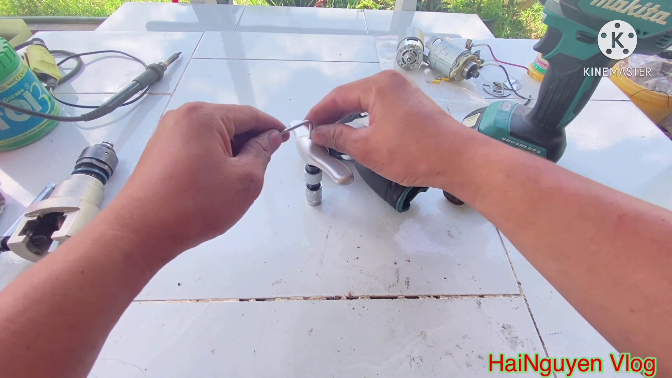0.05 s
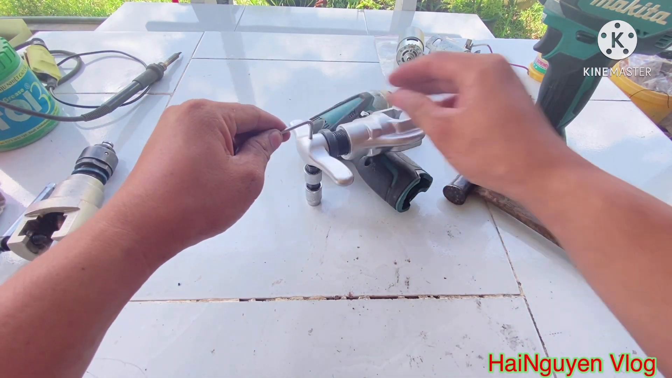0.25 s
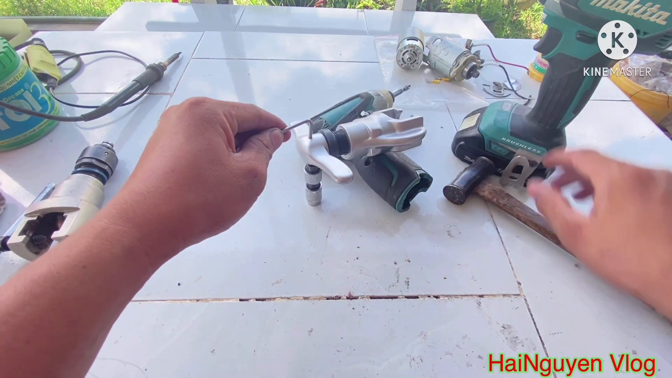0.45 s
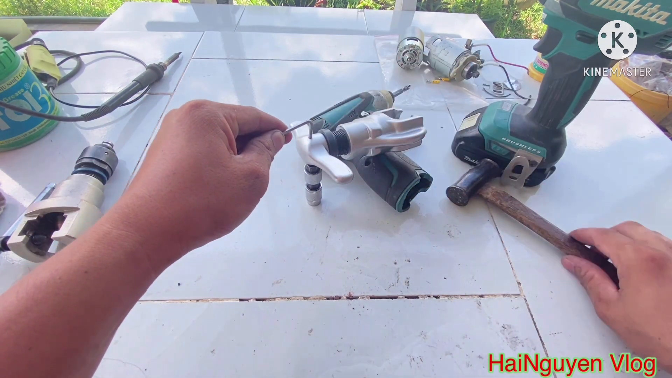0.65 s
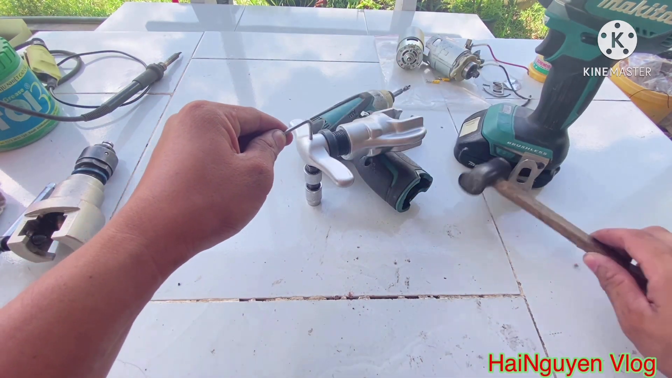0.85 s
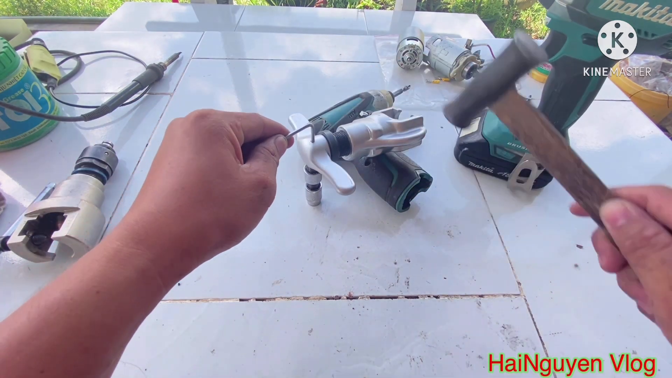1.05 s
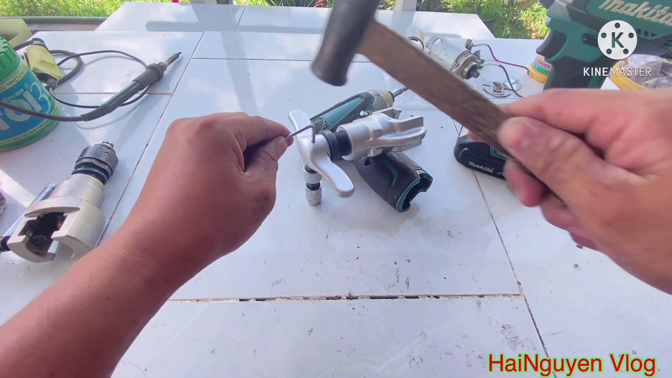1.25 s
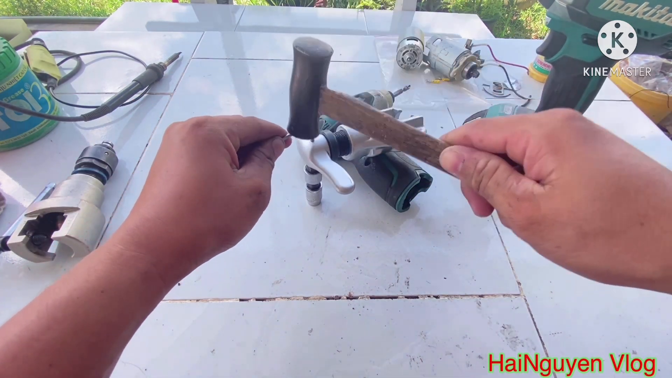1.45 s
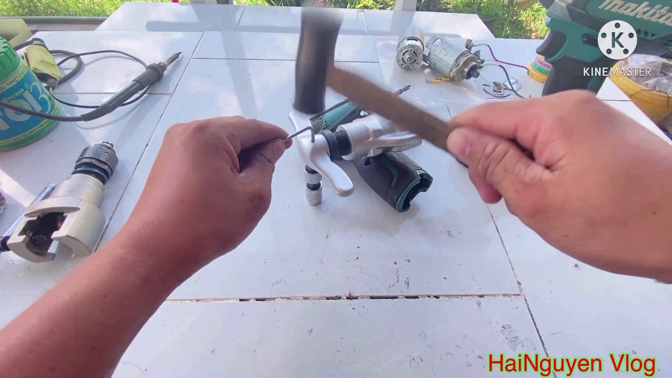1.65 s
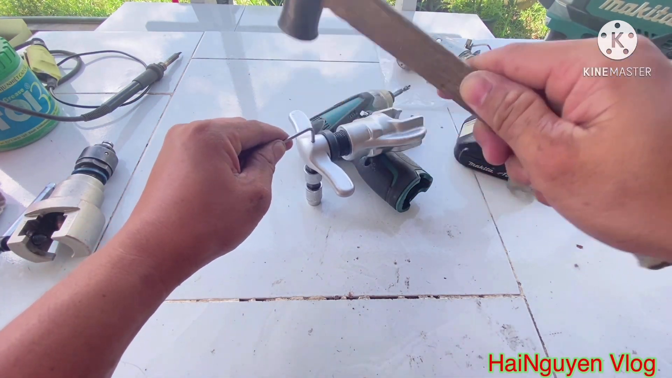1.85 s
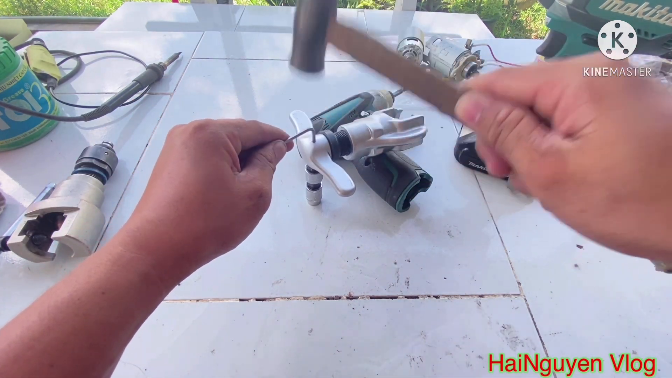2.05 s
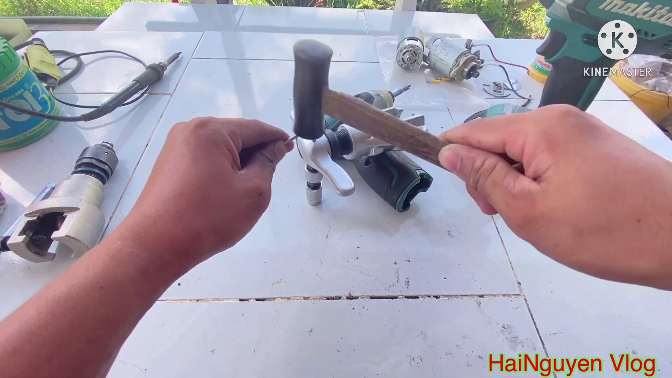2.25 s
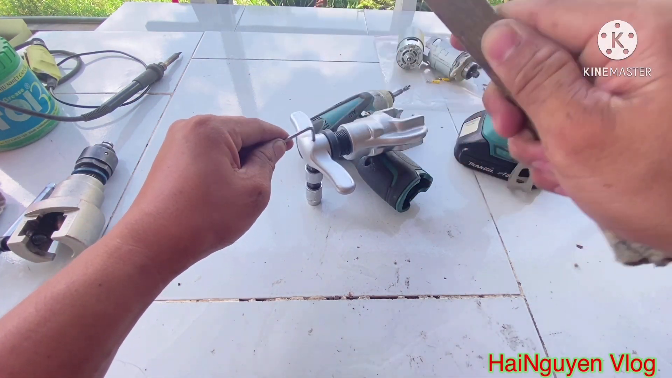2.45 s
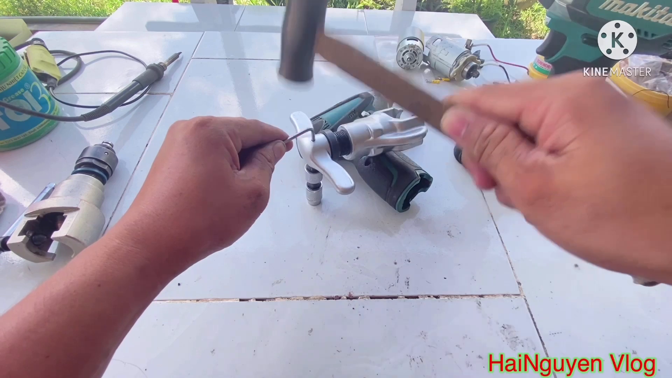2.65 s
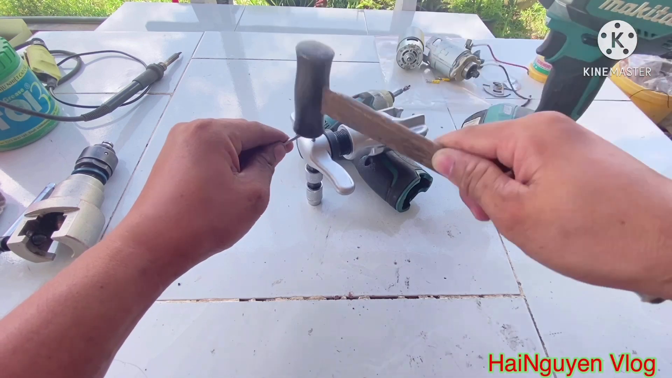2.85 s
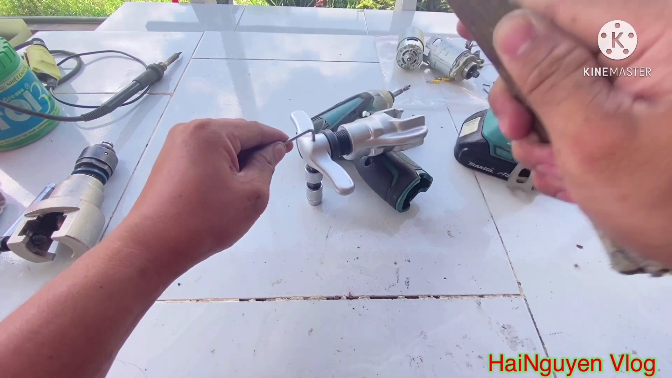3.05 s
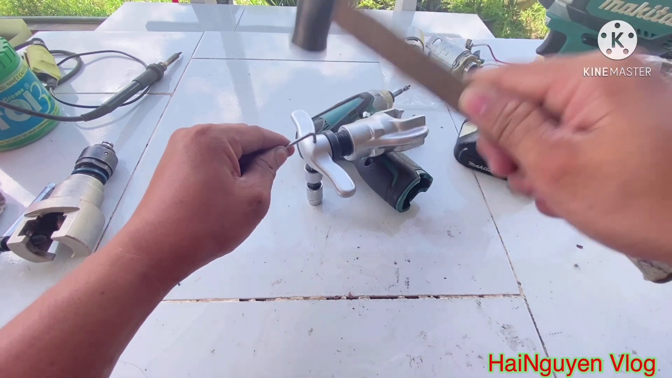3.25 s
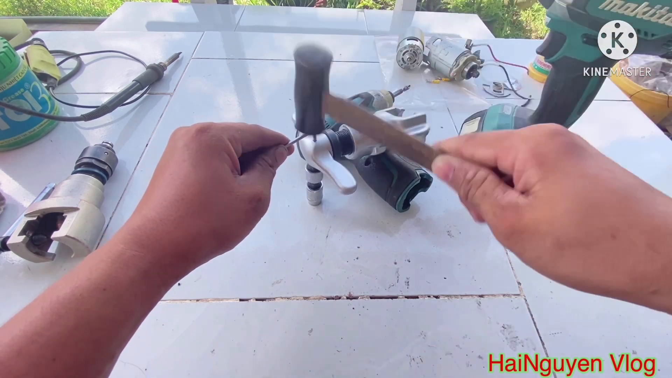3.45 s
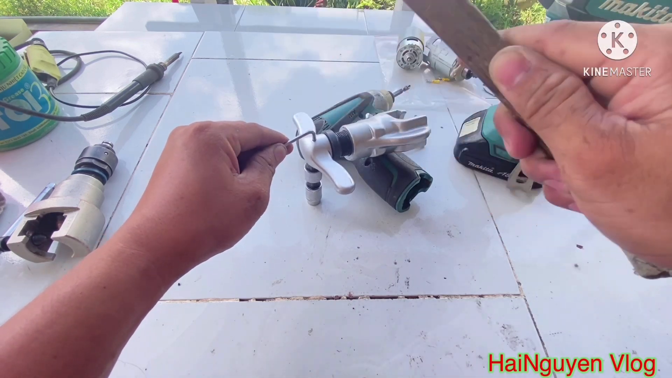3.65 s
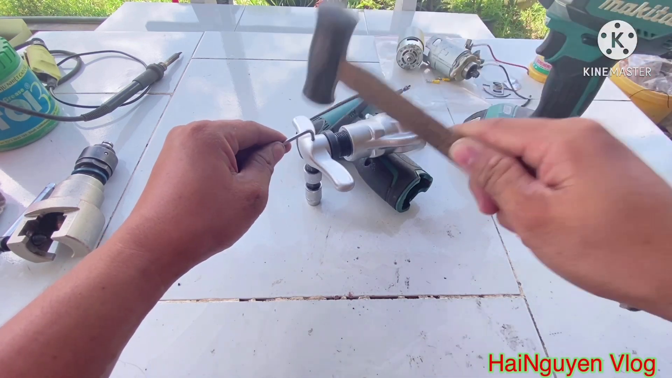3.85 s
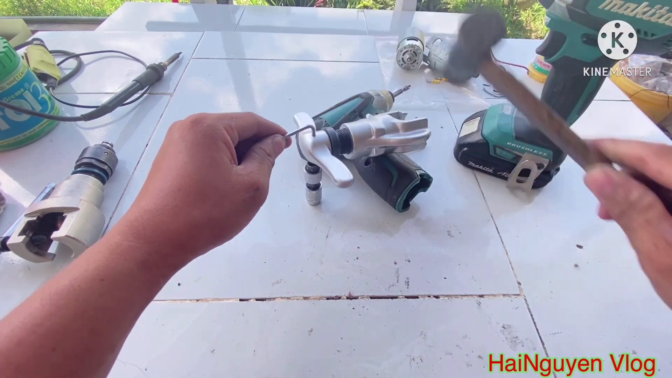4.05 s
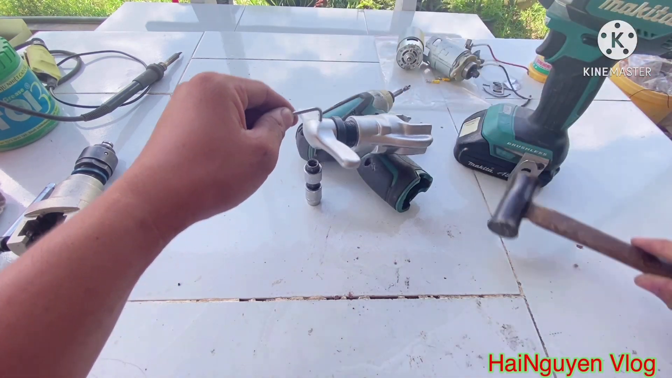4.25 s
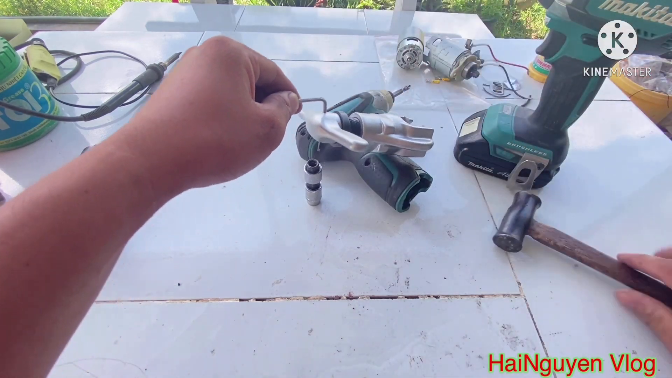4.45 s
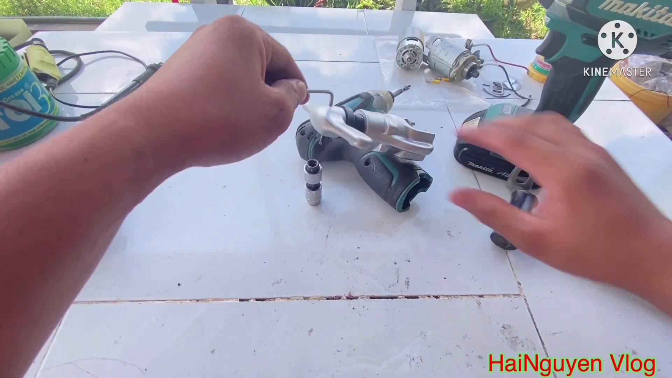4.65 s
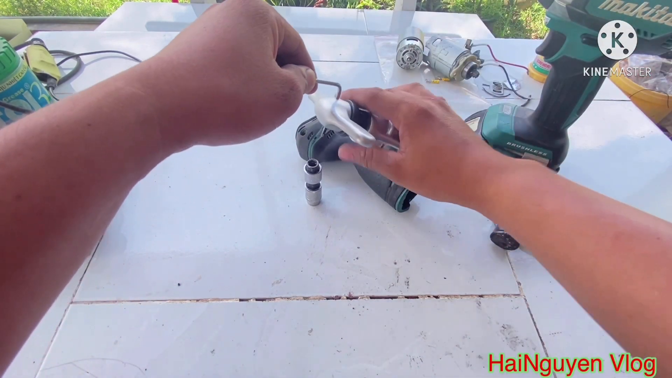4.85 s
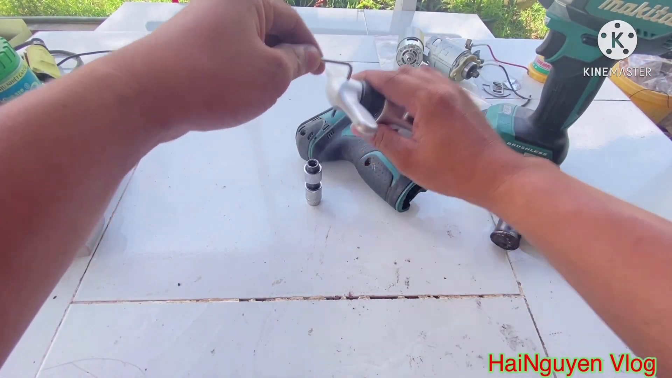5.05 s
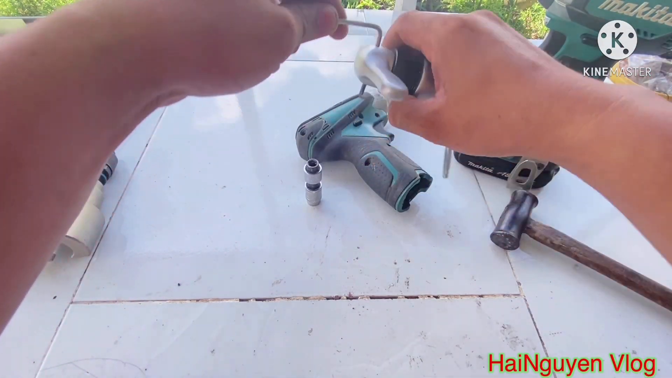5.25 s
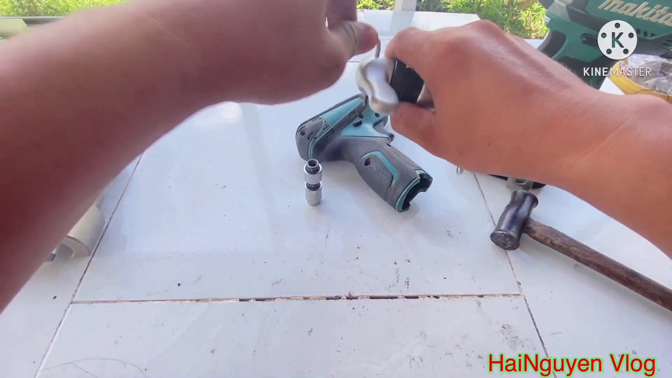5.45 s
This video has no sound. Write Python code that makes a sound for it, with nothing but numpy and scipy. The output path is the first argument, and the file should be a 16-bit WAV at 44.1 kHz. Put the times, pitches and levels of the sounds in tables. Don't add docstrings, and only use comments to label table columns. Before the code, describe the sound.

Sharp hammer taps on a small metal tool over a thin table, with passing traffic behind, ending in a rattling hammer drop and faint squeaks.

```python
import sys
import numpy as np
from scipy import signal
from scipy.fft import rfft, irfft, next_fast_len
from scipy.io import wavfile

SR = 44100
rng = np.random.default_rng(int(sys.argv[2]) if len(sys.argv) > 2 else 0)


def unload_wav(signal):
    wavfile.write(
        sys.argv[1],
        SR,
        np.round(np.clip(np.atleast_2d(signal).T, -1, 1) * 32767).astype(np.int16),
    )


def to_linear_factor(level_db):
    exponent = np.asarray(level_db, float) / 20
    return 10 ** exponent


N = 242982
TIME = np.arange(N) / SR

# tick level/dB, table level/dB, rattle level/dB
BLOWS = [
    (1.3718, -32.5, 4, 7.5, -9.5),
    (1.644, -8.5, -31.5, 1.5, -11),
    (1.91, -6, -20.5, -0.5, -8.5),
    (2.21, -2.5, -17.5, -1.5, -14),
    (2.517, -5, -16, 3.5, -5),
    (2.812, -6.5, -12.5, 3, -12),
    (3.108, -7.5, -14, 2, -9.5),
    (3.4137, -6, -19.5, -1.5, -11.5),
    (3.762, -6.5, -21, 0, -8),
]
# f/Hz, level/dB, t60/s
BODY = [(134, 3, 0.16), (165, -4, 0.21), (212, -1, 0.079), (271, -16.5, 0.021), (332.2, -3, 0.15),
        (378.6, 0, 0.18), (458, -6.5, 0.13), (560, -9, 0.07), (622.5, -10, 0.088), (1320, -8, 0.019),
        (1740, -4, 0.086), (2086, -4, 0.034), (2405, -2, 0.028), (2577, -13, 0.15)]
# f/Hz, level/dB per Hz
RATTLE_COLOUR = [(60, -33), (110, -11.5), (380, -10.5), (780, -4), (1050, -5.5), (1440, -30), (1700, -27),
                 (2450, -15), (3000, -39), (4500, -24.5), (7200, -26), (9300, -55.5), (13300, -52.5),
                 (16500, -65.5)]
# f/Hz, t60/s
TAIL_T60 = [(100, 0.6), (400, 0.33), (1000, 0.12), (3000, 0.22), (8000, 0.11), (16000, 0.048)]
THUMP_DB, BODY_DB = -8, -8


def blows():
    s, peak, tick, table, rattle = np.transpose(BLOWS)
    wave = bending_wave(delay_s=0.0024, power=0.6657)
    low = signal.sosfilt(signal.butter(2, 650, fs=SR, output="sos"), wave)
    out = signal.fftconvolve(clicks(s - 0.0012, peak + 4), wave - low)[:N]
    out += signal.fftconvolve(clicks(s - 0.0012, peak + table + THUMP_DB + 18), low)[:N]
    crack = fading(s + 0.0016, peak + tick + 19, 0.011) * rng.standard_normal(N)
    out += signal.sosfilt(signal.butter(2, 6000, "high", fs=SR, output="sos"), crack)
    out += rings(peak)
    out += struck(BODY, s + 0.004116, peak + table + BODY_DB, spread_db=4.0)
    lead_in = fading(s - 0.0075, peak - 19, 0.07)
    for hz, noise in bands(rng.standard_normal((2, N))):
        tail = fading(s + 0.0026, peak + rattle + 8, at_hz(TAIL_T60, hz))
        grating = lead_in * (hz > 500) * np.sqrt(hz / 300)
        out += to_linear_factor(at_hz(RATTLE_COLOUR, hz) + 16) * noise * (tail + grating)
    return signal.lfilter(*signal.iirnotch(790, 3.5, fs=SR), out)


# f/Hz, level/dB
BLOW_COLOUR = [(70, -30), (120, -5), (330, 0), (480, -3), (780, -24), (1080, -2), (1450, -16), (1700, -12),
               (2350, -13), (3200, -27), (5000, -22), (7000, -30), (10500, -28), (16500, -32)]


def bending_wave(delay_s, power):
    size = 4096
    hz = np.arange(1, 2050) * SR / size
    delay = 0.0031 + delay_s * (np.maximum(hz, 120) / 1000) ** -power
    phase = 2 * np.pi * np.cumsum(delay) * SR / size
    wave = irfft(to_linear_factor(at_hz(BLOW_COLOUR, hz)) * np.exp(-1j * phase))[:2500]
    return wave / np.abs(wave).max()


# t/s, then level/dB of 1 kHz knock, 3.7 kHz, 4.8 kHz, above 8 kHz
RINGING = [(1.372, 15.5, -28, -32, -15), (1.644, 9, -26, -27, -42), (1.910, -1.5, -4.5, -9.5, -10.5),
           (2.209, -52.5, -11.5, -38, -23.5), (2.519, -8.5, -9.5, -16.5, -6),
           (2.811, 6.5, -14.5, -15.5, -25), (3.107, 9, -24.5, -13, -34.5), (3.4143, 1, -26, -28, -29),
           (3.762, 4, -11.5, -6.5, -8.5)]
# t/s, then level/dB of 1 kHz knock, 3.7 kHz, 4.8 kHz, above 8 kHz
REBOUNDS = [(1.679, -23, -47, -52, -56), (1.958, -59, -40, -35, -37), (2.545, -8, -47, -36.5, -35),
            (2.843, -37, -20, -32, -28.5), (3.129, -39.5, -18.5, -41.5, -33), (3.192, -42, -33.5, -53, -40),
            (3.44, -25.5, -35, -55, -36), (3.466, -55, -31, -38, -36), (3.489, -42, -32, -43, -43.5),
            (3.803, -65, -31, -38, -30.5)]
# f/Hz, level/dB, t60/s
RINGS = [
    [(975, -4, .03), (1004, -25, .35), (1050, -1, .04), (1027, -25, .45), (1150, -3, .02), (1056, -28, .3)],
    [(3666, 0, .075), (3712, -10, .1)],
    [(4800, 0, .095), (4660, -8, .03)],
    [(8780, 0, .055), (8500, -8, .04)],
    [(9080, 0, .12), (10200, -7, .03), (10610, -9, .03), (11300, -10, .025)],
]
TOP_ON_BLOW_DB, SHANK_ON_REBOUND_DB = -7, -10
KNOCK_BAND_HZ = 945, 1180


def rings(peak):
    s, *first = np.transpose(RINGING)
    later, *again = np.transpose(REBOUNDS)
    first.append(first[3] + TOP_ON_BLOW_DB)
    again.insert(3, again[3] + SHANK_ON_REBOUND_DB)
    seconds = np.append(s + 0.0022, later)
    groups = []
    for modes, on_blow, on_rebound in zip(RINGS, first, again):
        flutter = to_linear_factor(2.5 * drift(50))
        groups.append(flutter * struck(modes, seconds, np.append(peak + on_blow, on_rebound), spread_db=1.5))
    knock, *steel = groups
    return signal.sosfilt(signal.butter(1, KNOCK_BAND_HZ, "band", fs=SR, output="sos"), knock) + sum(steel)


# t/s, peak level/dB
ROCKING = [(4.2826, -11), (4.301, -6), (4.318, -12), (4.369, -2.5), (4.414, -7), (4.446, -8), (4.472, -11),
           (4.494, -16.5), (4.506, -22), (4.522, -20)]
# f/Hz, level/dB, t60/s
HAMMER = [(388, -11, 0.074), (513, -5, 0.033), (979, -0.5, 0.05), (1050, -3, 0.096), (1308.4, -4.5, 0.043),
          (1370, -7, 0.025), (1681, -0.5, 0.032), (2040, -5, 0.072), (2136, -3, 0.046), (2600, -30, 0.025),
          (3100, -37, 0.026), (3610, -10, 0.036), (4580, -31, 0.018), (5400, -14, 0.018)]
# f/Hz, level/dB per Hz
ROCK_COLOUR = [(70, -40.5), (140, -4), (300, -18), (500, -4), (750, -31.5), (1050, -0.5), (2100, -11),
               (2800, -5.5), (5400, -7.5), (7300, -17.5), (10000, -29), (12700, -36), (16500, -35.5)]
# start t/s, end t/s, level/dB
ROCK_SPELLS = [
    (4.273, 4.281, -33),
    (4.284, 4.325, -12.5),
    (4.372, 4.55, -13),
]
ROCK_SAG_DB_PER_S, ROCK_RELEASE_DB_PER_S = -31, 272


def dropped_hammer():
    s, peak = np.transpose(ROCKING)
    bounces = struck(HAMMER, s + 0.001, peak - 6, spread_db=2.5)
    bounces = bounces + struck(HAMMER, s + 0.0032, peak - 7, spread_db=3.0)
    grit = rms_one(coloured(rng.standard_normal(N), ROCK_COLOUR))
    puffs = grit * fading(s, peak - 4, 0.039)
    level = to_linear_factor(-6.0) * spells(ROCK_SPELLS, ROCK_SAG_DB_PER_S, ROCK_RELEASE_DB_PER_S)
    grains = (rng.random(N) < 1500 / SR) * rng.standard_normal(N)
    rocking = rms_one(sum(to_linear_factor(db) * ring(grains, hz, t60) for hz, db, t60 in HAMMER))
    dull = signal.butter(4, 6000, fs=SR, output="sos")
    return bounces + puffs + level * signal.sosfilt(dull, 0.7 * rocking + 0.28 * grit)


# t/s, peak level/dB, ring f/Hz
TOUCHES = [(0.7385, -27.5, 3700), (0.788, -29.5, 2780), (0.583, -23, 4000), (3.4068, -17.5, 4270),
           (3.4095, -12.5, 1050), (3.7555, -27, 5020), (3.838, -23.5, 3400), (5.0207, -40, 3780),
           (5.1113, -50, 3740), (5.203, -46, 9300), (5.298, -48, 9200), (5.362, -49.5, 9200),
           (5.2048, -54, 2600), (5.2279, -37.5, 4840), (5.269, -48, 3100), (5.3053, -38, 3758),
           (5.3293, -42.5, 3850), (5.3705, -47, 3780), (5.4229, -42.5, 3940),
           (0.757, -35, 1100), (0.9716, -26.5, 968), (0.973, -25.5, 1545), (0.99, -29, 1070),
                (5.1785, -55, 1356), (5.458, -57, 990)]


def touches():
    out = np.zeros(N)
    for s, db, hz in TOUCHES:
        i = round(s * SR)
        hit = np.append(to_linear_factor(db - 3), np.zeros(2000))[:N - i]
        click = ring(hit, hz, 60.0 / hz)
        click += 0.59 * ring(hit, hz * 0.84, 41.0 / hz)
        click += 0.27 * ring(hit, hz * 1.7, 75.0 / hz)
        click += 0.05 * ring(hit, 9500, 0.0022)
        out[i:i + len(hit)] += click
    return out


# middle t/s, length/s, level/dB
RUBBING = [(0.775, 0.23, -46.5), (1.022, 0.26, -43.5), (4.902, 0.45, -71), (5.1, 0.15, -70),
           (5.324, 0.18, -75)]


def rubbing():
    grains = (rng.random(N) < 4000 / SR) * rng.standard_normal(N)
    level = sum(to_linear_factor(db) * swell(s, length) for s, length, db in RUBBING)
    bright = ring(ring(grains, 5300, 0.0028), 5400, 0.00091)
    return level * to_linear_factor(1.9 * drift(9.7)) * rms_one(ring(grains, 2200, 0.0015) + bright / 8)


# t/s, length/s, f/Hz, level/dB
SQUEAKS = [(4.843, 0.063, 4260, -65), (4.843, 0.14, 2520, -71), (4.92, 0.036, 1683, -55.5),
           (4.97, 0.061, 1690, -64), (5.186, 0.052, 1394, -60), (5.223, 0.12, 986, -62.5),
           (5.29, 0.036, 1430, -65.5), (5.474, 0.049, 1420, -62)]


def squeaks():
    white = rng.standard_normal(N)
    out = np.zeros(N)
    for s, length, hz, db in SQUEAKS:
        shape = np.sin(np.pi * np.clip((TIME - s) / length, 0, 1))
        out += to_linear_factor(db) * shape * rms_one(ring(ring(white, hz, 57.0 / hz), hz, 70.0 / hz))
    return out


HORN_HZ = 462.5
# multiple of HORN_HZ, level/dB
HORN_ORDERS = [(7, -13.5), (8, 0), (9, -0.5), (10, -21), (11, -22), (12, -43), (17, -33), (18, -26.5),
               (21, -30.5), (22, -31), (23, -35), (24, -47)]
# start t/s, end t/s, level/dB
HONKS = [
    (-.02, .172, -34.5),
    (.317, .53, -32),
]
HORN_SWELL_DB_PER_S, HORN_RELEASE_DB_PER_S, HORN_TAIL_DB, HORN_TAIL_T60_S = 13, 166, -16, 1.1
# t/s, depth level/dB
STUMBLES = [
    (.03, -7),
    (0.415, -11),
]
STUMBLE_S = 0.0053


def horn():
    turn = 2 * np.pi * HORN_HZ * TIME
    lines = sum(to_linear_factor(db + 2.2 * drift(22)) * np.sin(k * turn + 0.55 * drift(22)) for k, db in HORN_ORDERS)
    buzz = to_linear_factor(-15) * rms_one(ring(ring(rng.standard_normal(N), 3600, 0.004), 3950, 0.004))
    level = spells(HONKS, HORN_SWELL_DB_PER_S, HORN_RELEASE_DB_PER_S)
    level = level * to_linear_factor(sum(db * np.exp(-((TIME - s) / STUMBLE_S) ** 2) for s, db in STUMBLES))
    ends = [end for _, end, _ in HONKS]
    tail = fading(ends, [db + HORN_TAIL_DB for _, _, db in HONKS], HORN_TAIL_T60_S)
    return (level + tail) * (lines + buzz)


# t/s, firing f/Hz, level/dB
ENGINE = [
    (0.0, 50.83, -38),
    (.6, 49.36, -35),
    (1.5, 44.83, -29.5),
    (2.2, 44.5, -39.5),
    (2.8, 42.9, -34.5),
    (3.5, 41.8, -52.5),
    (4.0, 42.13, -46.5),
    (5.51, 41.3, -60.5),
]
# multiple, level/dB at the start, share of the fading it follows
ENGINE_ORDERS = [(1, -4, 1), (2, -6.5, 0.052), (3, -5, 1), (4, -7.5, .7), (5, -13.5, 0.31), (6, -14, 0.35),
                 (8, -18.5, 0.2), (9, -23.5, 0.48), (10, -25, .6)]
# middle t/s, length/s, f/Hz, level/dB
BOOMS = [(0.39, .4, 80, -34.5), (1.223, 0.34, 234, -46.5), (1.85, 0.45, 90, -30.5), (2.14, 0.62, 89.4, -32),
         (2.114, 0.23, 218, -34.5), (2.455, 0.19, 252, -36.5), (2.7, 0.27, 211, -29.5),
         (3.05, 0.34, 83, -30), (3.317, 0.46, 82.7, -30), (3.33, 0.19, 165, -38), (3.67, 0.56, 82.7, -36.5),
         (4.6, 0.52, 82.8, -45.5), (1.39, 0.46, 134, -46)]


def engine():
    hz, loud = in_time(ENGINE)
    turn = 2 * np.pi * np.cumsum(hz) / SR
    out = np.zeros(N)
    for k, db, share in ENGINE_ORDERS:
        level_db = loud[0] + db + share * (loud - loud[0])
        out += to_linear_factor(level_db + 4.4 * drift(1.0)) * np.sin(k * turn + 1.2 * drift(3.8))
    for s, length, boom_hz, db in BOOMS:
        out += to_linear_factor(db + 3) * swell(s, length) * np.sin(2 * np.pi * boom_hz * TIME)
    return out


# f/Hz, level/dB per Hz
ROAD_COLOUR = [(25, -34), (45, -3), (150, -2), (310, -12), (1130, -21.5), (2000, -25.5), (5500, -26.5),
               (7000, -33), (8000, -39.5), (9000, -37.5), (12200, -40), (12700, -78), (14400, -67.5),
               (15400, -33)]
# f/Hz, left-right likeness/1
ROAD_LIKENESS = [(60, 0.96), (180, 1), (550, 0.25), (1650, 0.12), (5000, 0.098), (15000, 0.25)]
# t/s, level/dB
TRAFFIC = [(0.0, -50), (.3, -49.5), (.93, -43), (1.4, -46), (2.1, -43.5), (2.39, -35), (2.65, -39.5),
           (3.0, -45), (3.4, -47), (3.82, -48.5), (4.0, -53.5), (4.2, -61.5), (4.75, -57), (5.51, -61)]
# level/dB re traffic, share of its swing, loss/dB per s as it moves off
ROAD_LAYERS = [
    (11, 0.59, 1.36),
    (3.5, 1, 0.42),
    (0, 1, 1.5),
]


def road():
    layers, together = np.zeros((3, 2, N)), drift(0.37)
    for hz, (mid, side) in bands(coloured(rng.standard_normal((2, 2, N)), ROAD_COLOUR)):
        alike = np.clip(at_hz(ROAD_LIKENESS, hz), 0, 1)
        gain = to_linear_factor(0.7 * together + 1.1 * drift(8))
        stereo = np.sqrt(1 + alike) * mid + np.sqrt(1 - alike) * side * [[1], [-1]]
        layers[int(hz > 350) + int(hz > 3200)] += gain * stereo
    near, = in_time(TRAFFIC)
    return sum(to_linear_factor(near[0] + db + share * (near - near[0]) - loss_db * TIME) * rms_one(layer)
               for (db, share, loss_db), layer in zip(ROAD_LAYERS, layers))


def yard(x):
    dull = signal.sosfilt(signal.butter(1, [350, 3500], "band", fs=SR, output="sos"), x)
    lags = rng.uniform(0.003, 0.18, (2, 8))
    return np.array([signal.fftconvolve(dull, clicks(side, -13 - 220 * side)[:4000])[:N] for side in lags])


def clicks(seconds, db):
    out = np.full(N, 1e-18)
    out[np.round(np.asarray(seconds) * SR).astype(int)] = to_linear_factor(db)
    return out


def ring(x, hz, t60):
    r, w = to_linear_factor(-60 / (t60 * SR)), 2 * np.pi * hz / SR
    return signal.lfilter([0, np.sin(w)], [1, -2 * r * np.cos(w), r * r], x)


def struck(modes, seconds, db, spread_db):
    luck = rng.standard_normal((len(seconds), len(modes)))
    return sum((-1) ** k * ring(clicks(seconds, db + level_db + spread_db * luck[:, k]), hz, t60)
               for k, (hz, level_db, t60) in enumerate(modes))


def fading(seconds, db, t60):
    return signal.lfilter([1], [1, -to_linear_factor(-60 / (t60 * SR))], clicks(seconds, db))


def spells(rows, swell_db_per_s, release_db_per_s):
    out = np.zeros(N)
    for start, end, db in rows:
        held_db = db + swell_db_per_s * (np.minimum(TIME, end) - start)
        attack = np.clip((TIME - start) / 0.004, 0, 1)
        out += attack * to_linear_factor(held_db - release_db_per_s * np.maximum(TIME - end, 0))
    return out


def swell(middle, length):
    return np.cos(np.pi * np.clip((TIME - middle) / length, -0.5, 0.5)) ** 2


def drift(rate):
    r = np.exp(-80 * np.pi * rate / SR)
    slow = signal.lfilter([1], [1, -2 * r, r * r], rng.standard_normal(N // 40 + 2002))[2000:]
    return np.interp(np.arange(N) / 40, np.arange(len(slow)), rms_one(slow))


def coloured(x, spectrum):
    hz = np.maximum(np.arange(N // 2 + 1) * SR / N, 1)
    return irfft(rfft(x) * to_linear_factor(at_hz(spectrum, hz)), N)


EDGES = 22 * 2 ** np.arange(0, 9.7, .4)


def bands(white):
    for k, (low, high) in enumerate(zip(EDGES, EDGES[1:])):
        band = signal.butter(2, [low, high], "band", fs=SR, output="sos")
        yield np.sqrt(low * high), signal.sosfilt(band, white[k % 2])


def rms_one(x):
    return x / np.sqrt(np.mean(x ** 2) + 1e-20)


def in_time(rows):
    s, *columns = np.transpose(rows)
    return [np.interp(TIME, s, c) for c in columns]


def at_hz(points, hz):
    return np.interp(np.log(hz), np.log(np.array(points)[:, 0]), np.array(points)[:, 1])


# f/Hz, phase/rad
PORT_LEAD = [(0, 0), (2000, .55), (4600, 1.45), (7600, 3.1), (9000, 4.7), (10800, 6.3), (15200, 10.5),
             (22050, 17)]


def ports(left, right, tilt_db):
    size = next_fast_len(N + 4096)
    hz = np.maximum(np.arange(size // 2 + 1) * SR / size, 1)
    half = to_linear_factor(at_hz(tilt_db, hz) / 2) * np.exp(0.5j * np.interp(hz, *np.transpose(PORT_LEAD)))
    return np.array([irfft(rfft(left, size) * half, size)[:N], irfft(rfft(right, size) / half, size)[:N]])


# f/Hz, level/dB
BENCH_TILT = [(60, -4.5), (110, -2), (200, 2.5), (380, -6), (700, 2.5), (1290, 5), (2380, 2), (4400, -13),
              (8120, 4.5), (15000, 0)]
DROP_TILT = [(60, 5.5), (110, -4), (200, 1), (380, -2), (700, 4.5), (1290, 3.5), (2380, -1), (4400, 0.5),
             (8120, 5.5), (15000, -1)]
ROAD_TILT = [(60, 0.5), (110, -1), (200, -1.0), (380, 0), (700, 1.5), (1290, 4.0), (2380, 1), (4400, 0),
             (8120, 1), (15000, -0.5)]


def scene():
    bench = blows() + touches() + rubbing()
    drop = dropped_hammer()
    honk = horn()
    far = ports(*(engine() + road() + honk), ROAD_TILT)
    echoes = yard(bench + drop + honk)
    bench = bench + squeaks()
    return ports(bench, bench, BENCH_TILT) + ports(drop, drop, DROP_TILT) + far + echoes


def low_pass(x):
    return signal.sosfilt(signal.butter(12, 16980, fs=SR, output="sos"), x)


def record(dry):
    over = np.maximum(20 * np.log10(np.abs(dry).max(axis=0) + 1e-9) + 14, 0)
    held = np.maximum.accumulate(over + 120 * TIME) - 120 * TIME
    duck = signal.lfilter([0.004], [1, -0.996], held)
    loud = 0.74 * np.tanh(dry * to_linear_factor(-0.45 * duck) / 0.78)
    mix = signal.sosfilt(signal.cheby2(10, 60, 16900, fs=SR, output="sos"), loud)
    return low_pass(mix)


dry = scene()
out = record(dry)
unload_wav(out)
```